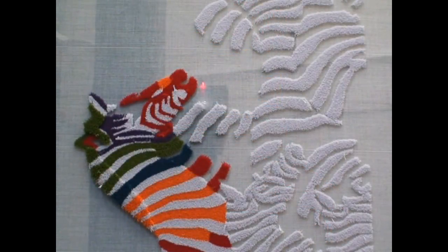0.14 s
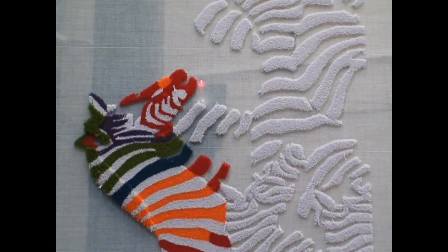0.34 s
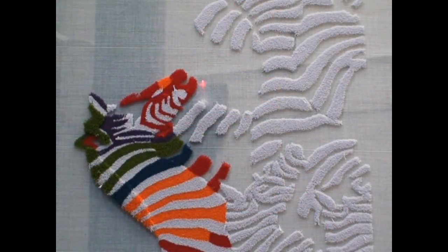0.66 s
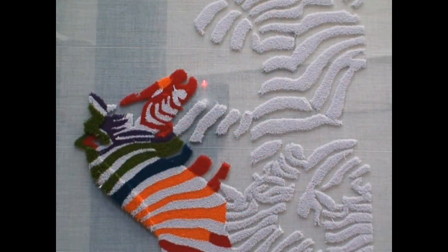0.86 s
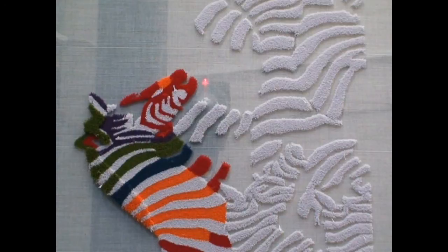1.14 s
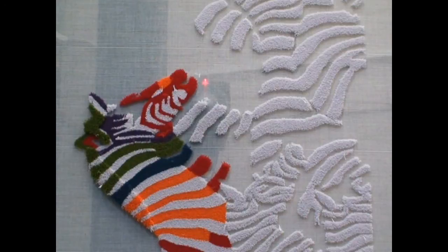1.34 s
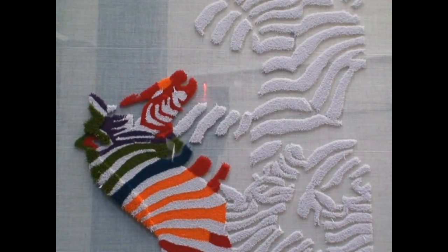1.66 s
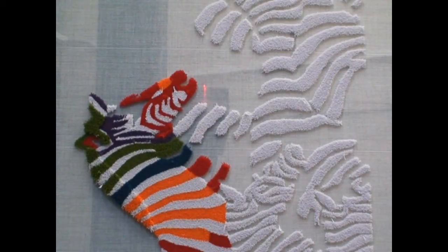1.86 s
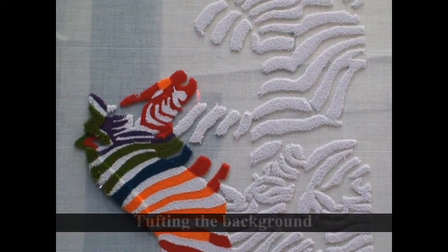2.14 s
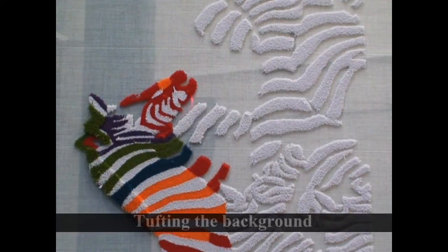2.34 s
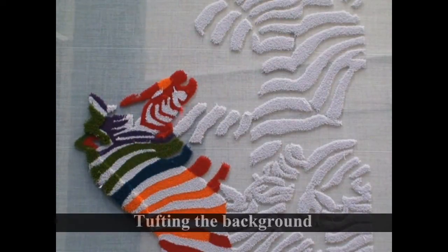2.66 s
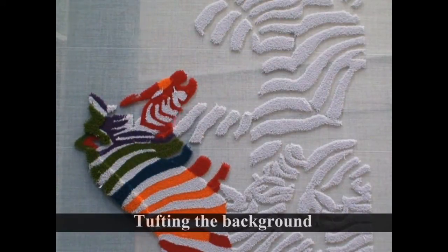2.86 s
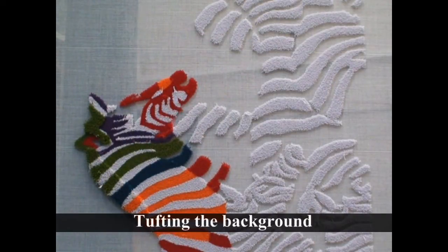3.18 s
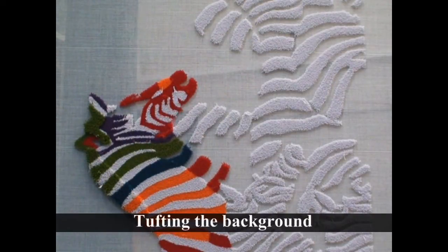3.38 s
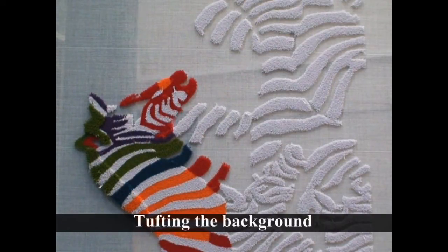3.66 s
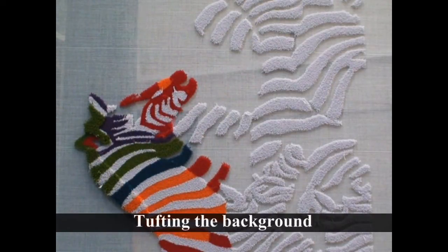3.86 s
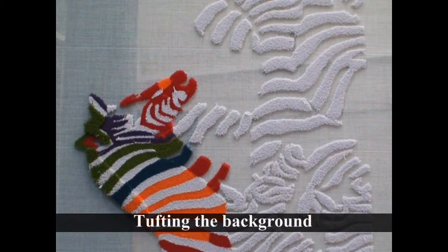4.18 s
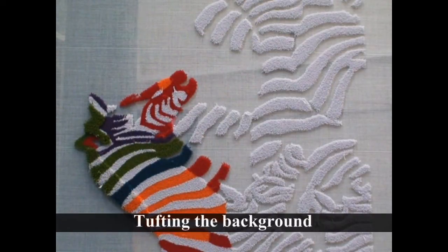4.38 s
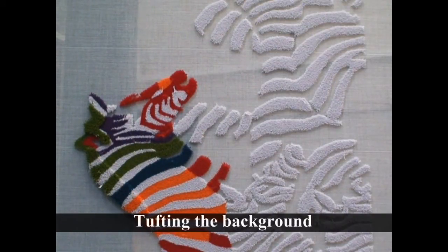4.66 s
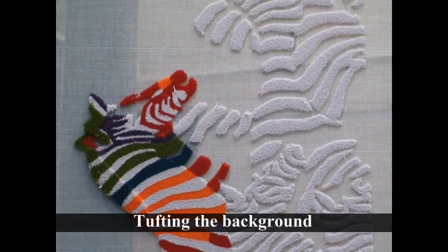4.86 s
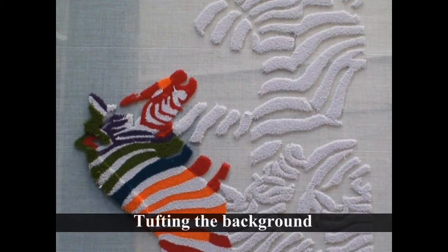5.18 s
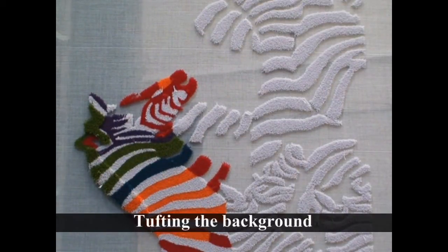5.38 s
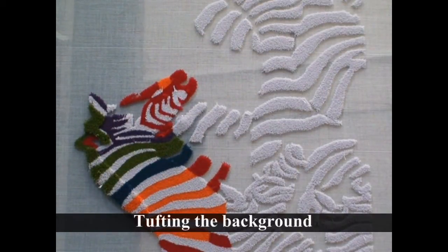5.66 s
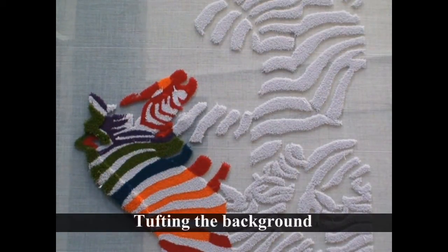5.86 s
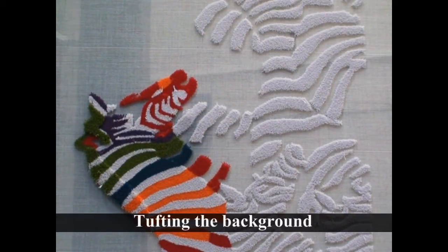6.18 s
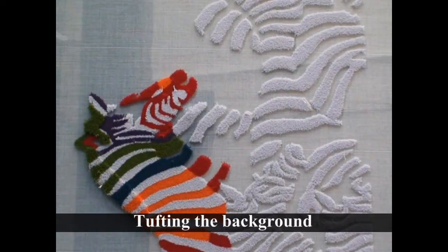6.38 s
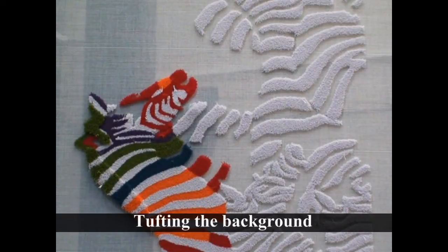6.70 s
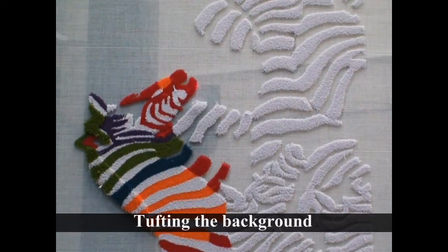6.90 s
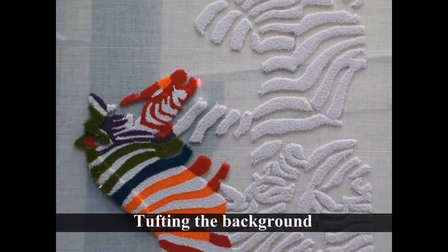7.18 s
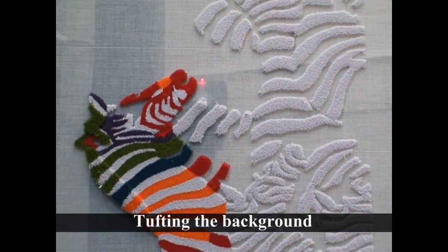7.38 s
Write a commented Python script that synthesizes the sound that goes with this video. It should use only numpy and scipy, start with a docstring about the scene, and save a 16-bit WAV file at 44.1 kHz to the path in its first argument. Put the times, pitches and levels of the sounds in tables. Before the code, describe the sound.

A pneumatic tufting machine hammers about seventeen times a second with puffs of air and an early hissing blast. It stops, stutters briefly and coasts down. A dull clunk leads into a whining, hissing head travel that brakes smoothly. A knock and air blast follow, then a low rumble, and the hammering resumes to the end with two close blasts. Close stereo in a ringing workshop.

```python
"""A tufting machine hammers yarn into a stretched cloth at about 17 stitches a second: knocks and air puffs,
with a blast of air near the start. After about a second it pauses, stitches briefly and coasts to a halt.
The head travels with a whine and a hiss, vents a blast of air and shifts with a rumble. It then stitches to
the end, with two more blasts. Knocks and air are shaped noise, the whine is a set of sines on one speed
curve, and a gain control holds down the loudest moments. A quiet workshop lies behind it all."""
import sys
import numpy as np
from scipy import signal
from scipy.fft import rfft, irfft
from scipy.io import wavfile
from scipy.ndimage import uniform_filter1d

SR = 44100
rng = np.random.default_rng(int(sys.argv[2]) if len(sys.argv) > 2 else 0)


def write(x):
    x = np.atleast_2d(x).T
    wavfile.write(sys.argv[1], SR, np.round(np.clip(x, -1, 1) * 32767).astype(np.int16))


N = 332514
T, HZ = np.arange(N) / SR, np.fft.rfftfreq(N, 1 / SR)  # time in s, frequencies in Hz

STITCH_HZ = 16.642
# bursts of stitching: first stitch t/s, end t/s, air level/dB
BURSTS = [(-.009, 1.043, -1.5), (1.13, 1.27, -4.5), (4.9, 4.905, 0.5), (5.0069, 7.55, 0)]
# knocks within one stitch: t/s after the air valve opens, low thud level/dB, clack level/dB
KNOCKS = [(0, -1.5, -3.5), (.006, 0, -3), (0.013, -2, -5), (0.019, -0.5, -10), (0.025, -7.5, 1),
          (.029, -0.5, -1), (.04, -3, 1), (.046, 4, -0.5), (.056, -1, -2.5)]
# the needle drive runs: start t/s, stop t/s, force level/dB, share of loose rattle level/dB,
# depth of the frame's resonances (0-1)
RUNS = [(-.01, 0.092, -22, -4, 0.9), (0.095, 1.24, -24.5, -3.5, 0.63), (4.879, 7.54, -22, -8, 1)]
FADE_DB_PER_S = 0.6  # the hammering weakens slightly as a run goes on
# it starts softly and dies away when switched off
SPIN_UP_S, SPIN_UP_DB, RUN_DOWN_DB_PER_S = 0.058, -4, 71
# colour of the frame: f/Hz, level/dB
FRAME = [(24, -55), (40, -26), (86, -10), (174, 1.5), (245, 3), (307, -2), (404, 1.5), (554, 0),
         (680, -3.5), (761, -1), (1120, -7.5), (2000, -11), (5990, -26.5), (8040, -26.5), (9000, 2),
         (11700, -48), (19800, -120)]
# resonances and dips of the head and its frame: f/Hz, width f/Hz, level/dB against the frame's colour
FRAME_MODES = [(167.7, 9.9, 4), (203, 24, 5), (240, 14.5, -8.5), (304.8, 26.4, 7.5), (351, 21, 5),
               (412, 20, -0.5), (445, 12, 5), (486, 12, 4), (515.4, 13, 7.5), (558, 20, 8), (620, 9.2, 3),
               (635, 15, 3.5), (677, 26, -4), (749, 16, 5), (853, 23, -8), (892, 13, 5.5), (925, 20, 7),
               (982, 16, 9.5), (1052, 18, 4.5), (1225, 30, 6), (1436, 28, 9), (1614, 21, 7), (2030, 12, 9)]
# a resonance swells as the head passes a lively spot: start t/s, length t/s, f/Hz, width f/Hz, level/dB
LIVELY_SPOTS = [(1.1, 0.62, 918, 15, 12), (4.86, 0.63, 886, 18, 9.5), (6.2, 2.1, 566.4, 13.7, 7),
                (7.218, 0.42, 494, 47, 7)]

# air while stitching, before pressure and setting: yarn jet, steady hiss and the nozzle's faint whistle
JET_DB, HISS_DB, WHISTLE_DB = -23.5, -23.5, -32
SHUT_OFF_DB_PER_S = 139
# the supply sags for as long as the valve vents, then refills
SAG_DB_PER_S, REFILL_S = 22.5, 0.58
# colour of the yarn jet: f/Hz, level/dB
JET = [(500, -2.5), (2000, 2), (4000, 1), (7000, 5.5), (10000, 6.5), (12500, 3), (14300, -5), (15000, -53)]
# colour of the steady hiss: f/Hz, level/dB
HISS = [(300, -10), (1000, 2), (2000, -1.5), (3000, 4), (3500, -0.5), (4100, 3), (5000, 0), (6000, 4),
        (7300, -10.5), (10000, -14.5), (14000, -54)]
# resonances of the whistling nozzle: f/Hz, width f/Hz, level/dB
NOZZLE = [(9830, 450, 1.5), (9400, 1700, -8), (11740, 850, -5.5)]
# the nozzle whistles louder: start t/s, length t/s, level/dB above its faint whistle
WHISTLES = [(-.15, 0.3, 11), (0.364, 0.48, 13), (0.936, 0.15, 12), (7.19, 0.34, 7)]

# the air valve vents: opening t/s, time open t/s, rush level/dB, hollow roar of the exhaust level/dB
BLASTS = [(0.085, 0.2, -10.5, -37), (3.641, 0.045, -38, -37), (3.684, 0.17, -13, -28.5),
          (5.854, 0.135, -12.5, -35), (5.985, 0.06, -7.5, -34)]
# colour of the rush: f/Hz, level/dB
BLAST = [(400, -46), (1300, -16), (2300, -7), (3100, -5.5), (3900, 1), (5000, 2), (6500, 1.5), (9500, 1.5),
         (12000, 1), (13200, -3.5), (15000, -12)]
# resonances and dips of the vent: f/Hz, width f/Hz, level/dB
VENT_MODES = [(4300, 380, -5.5), (4800, 300, -1), (5530, 410, -5), (6270, 690, 1.5), (9900, 900, -0.5),
              (11000, 500, -2)]
# colour of the roar: f/Hz, level/dB
EXHAUST = [(400, -23), (900, -1), (1300, 1.5), (1750, 8), (2300, 14), (3000, 7), (5000, -23), (9000, -14.5),
           (15000, -43)]
# resonances and dips of the exhaust: f/Hz, width f/Hz, level/dB
EXHAUST_MODES = [(1260, 86, 14), (2262, 290, 4.5), (3382, 410, -15), (3830, 130, 2), (5070, 280, 11.5)]

# the head is set down or lifted: t/s, level/dB, time to fall by 60 dB t/s
CLUNKS = [(1.838, -23.5, 0.92), (1.865, -28.5, 1), (4.881, -51, 0.13)]
# colour of these blows: f/Hz, level/dB
CLUNK = [(25, -38), (45, -22), (66, 5), (110, 11.5), (180, 0), (300, -2), (500, -7), (750, -9.5),
         (2000, -29), (5000, -34), (12000, -70)]
# the air cylinder knocks at both ends of its stroke: t/s, level/dB, time to fall by 60 dB t/s
CYLINDER_KNOCKS = [(3.648, -28.5, 0.31), (3.843, -34.5, 0.64)]
# colour of the cylinder's knocks: f/Hz, level/dB
CYLINDER = [(30, -16), (66, 2), (120, -3), (200, 7.5), (300, 2), (600, -4), (900, -7), (2000, -19),
            (8000, -55)]
# the nozzle spits as the air comes on: t/s, level/dB, time to fall by 60 dB t/s
SPITS = [(1.131, -23, 0.52), (3.639, -25, 0.67), (4.881, -27, 0.045), (4.903, -21, 0.086),
         (5.0115, -11.5, 0.18)]

# the needle drive coasts to a halt, its clatter swelling slightly and then fading
COAST_FROM_S, COAST_PEAK_S, COAST_PEAK_DB = 1.287, 1.48, -27
COAST_RISE_DB_PER_S, COAST_FALL_DB_PER_S = 1, 77
# colour of the coasting clatter: f/Hz, level/dB
COAST = [(100, -1), (220, 3), (330, 13), (400, 1), (480, 8.5), (720, -2), (920, 0.5), (1200, -20),
         (3000, -19), (9000, -57)]

# the head travels once: it speeds up, cruises and brakes smoothly to a halt
TRAVEL_S, SPEED_UP_S, BRAKE_S, BRAKING_S = 1.895, .105, 2.663, 0.43
CRUISE_HZ = 177  # basic pitch at full speed
SLIDE_DB, DRIVE_DB = -15.5, -22  # at cruising speed
# overtones of the drive: multiple of its basic pitch, level/dB
DRIVE_ORDERS = [(2, -10), (3, -16), (4, -9), (6, -9), (7, -14), (8, -8), (10, -20), (12, -9), (14, -17)]
# colour of the drive's grinding: f/Hz, level/dB
DRIVE = [(50, -36), (110, -9), (150, 7), (230, -19), (350, 0), (500, 1), (650, -5.5), (850, -4), (1200, -7),
         (2000, -11), (4000, -52)]
# resonances and dips of the rail: f/Hz, width f/Hz, level/dB
RAIL_MODES = [(345, 24, 3.5), (378, 20, 7.5), (408, 16, -5), (476, 44, 6), (562, 32, 9), (900, 98, -6),
              (1055, 49, 3.5)]
# the rail sings when an order of the drive meets a sharp resonance: f/Hz, width f/Hz, level/dB
RAIL_RINGS = [(477, 19, -37), (524.4, 15.4, -19), (643, 22, -31), (704, 26, -29)]
# colour of the sliding hiss: f/Hz, level/dB
SLIDE = [(700, -14), (1300, -37), (2200, -11), (2900, -8), (3900, -1.5), (5400, 0.5), (6500, -1.5),
         (8000, -7.5), (10000, -11), (12000, -16.5), (13600, -22), (14300, -57)]
# resonances within the sliding hiss: f/Hz, width f/Hz, level/dB
SLIDE_MODES = [(2803, 78, 10.5), (4150, 150, 0), (5280, 100, 2.5)]
# the rail howls as the head gathers speed and brakes: start t/s, length t/s, f/Hz, level/dB
HOWLS = [(1.994, .11, 526.6, -31), (1.997, 0.31, 648, -32), (2.704, 0.12, 520, -22),
         (2.72, 0.16, 489, -23.5), (2.86, 0.35, 538, -38), (2.935, 0.12, 760, -42)]

# slow shifts of the gantry: start t/s, length t/s, grinding level/dB, delay of the boom t/s, boom level/dB
SHIFTS = [(1.115, 0.63, -38.5, 0.2, -38.5), (1.8, 1.8, -43.5, 0.095, -47.5), (4.096, 0.24, -48, 0.031, -43),
          (4.185, 0.62, -35, 0.13, -39)]
# colour of the gantry: f/Hz, level/dB
GANTRY = [(25, -32), (65, -2.5), (150, 1), (235, -2), (400, -12), (520, -24), (620, -22), (830, -13),
          (950, -25), (1300, -22.5), (1700, -24.5), (2500, -24.5), (4000, -32.5), (9000, -47),
          (14000, -73.5)]
# resonances that the gantry's whirr excites: f/Hz, width f/Hz, level/dB
GANTRY_MODES = [(159, 16, 6), (250, 21, 4.5), (308, 14, 8), (378, 18, 5.5), (803, 30, 4), (1046, 27, 10),
                (1310, 60, 9)]

# air seeps from the idle nozzle, easing to a steady leak until the head moves off
SEEP_FROM_S, SEEP_UNTIL_S, SEEP_DB = 1.37, 1.92, -47.5
SEEP_EXTRA_DB, SEEP_EASE_S = 5, .18
# colour of the seeping air: f/Hz, level/dB
SEEP = [(1000, -10), (2400, -4), (2950, 10), (3500, 3), (5500, 3.5), (8500, -2), (10000, -2), (11200, 5),
        (12300, -4), (13200, -34)]
SHOP_DB = -43.5
# colour of the workshop's background noise: f/Hz, level/dB
SHOP = [(25, -22), (60, -11), (120, -3), (230, -16), (310, -10), (480, -12.5), (900, -17), (1600, -22),
        (3000, -29.5), (7300, -41), (12000, -44), (14000, -64)]
# a faint, thin sizzle: f/Hz, width f/Hz, level/dB
SHOP_SIZZLE = [(12100, 450, 15.5)]
# faint, wavering hum tones: f/Hz, level/dB
HUM = [(116, -64), (307, -53.5), (520, -59.5), (1340, -68), (9324, -78)]

# how long the room rings: f/Hz, time to fall by 60 dB t/s
ROOM = [(200, 1), (1500, 1), (4000, 0.91), (8000, 0.62), (14000, 0.29)]
# resonances and dips of the stretched cloth, under every source: f/Hz, width f/Hz, level/dB
CLOTH_MODES = [(67, 20.3, 5.5), (86, 16, -15), (109, 7.5, 4)]
# stereo width: f/Hz, side level/dB
WIDTH = [(40, -29), (130, -22), (300, -8.5), (700, -9.5), (1500, -8), (5500, -7.5), (8000, -11),
         (11000, -25), (14000, -54)]
# stereo balance: f/Hz, left minus right level/dB
LEAN = [(60, 2), (300, 1), (700, 0.5), (1500, 1.5), (12000, -0.2)]
# the two microphone ports: f/Hz, phase by which left leads/radians
LEAD = [(0, -0.49), (340, -0.73), (690, -0.44), (950, -0.89), (1380, 0.57), (3010, -0.07), (5680, 0.63),
        (7840, 0.45), (11000, 0.12), (15200, 0)]
EDGE_HZ = 15160  # the treble ends here


def amp(db):
    """Turns dB into a plain gain."""
    return 10 ** (np.asarray(db) / 20)


def unit(x):
    """Scales each channel to rms 1."""
    return x / np.sqrt(np.mean(x ** 2, -1, keepdims=True) + 1e-20)


def read(points, hz=HZ):
    """Reads a curve joined by straight lines over log frequency."""
    f, value = np.transpose(points)
    return np.interp(np.log(hz + 1), np.log(f + 1), value)


def bumps(modes):
    """Resonances and dips as a dB curve."""
    return sum(db / (1 + ((HZ - hz) / (width / 2)) ** 4) for hz, width, db in modes)


def below_db(hz):
    """A dB curve that keeps what lies below hz."""
    return -10 * np.log10(1 + (HZ / hz) ** 4)


def above_db(hz):
    """A dB curve that keeps what lies above hz."""
    return -10 * np.log10(1 + (hz / (HZ + 1)) ** 4)


def colour(x, db):
    """Filters x by a gain in dB for every frequency."""
    return irfft(rfft(x) * amp(db), N)


def noise(db):
    """Mid and side noise of the given colour, each of rms 1."""
    return unit(colour(rng.standard_normal((2, N)), db))


def wander(hz):
    """A random curve of rms 1 that changes no faster than about hz."""
    return unit(irfft(rfft(rng.standard_normal(N)) / (1 + (HZ / hz) ** 4), N))


def gate(start, end, edge):
    """Rises after start and falls after end, within edge seconds."""
    return np.clip((T - start) / edge, 0, 1) * np.clip((end - T) / edge + 1, 0, 1)


def held(start, end, release_db_per_s):
    """Switches on at start, holds, and dies away after end."""
    return np.clip((T - start) / 0.0026, 0, 1) * amp(-release_db_per_s * np.maximum(T - end, 0))


def settling(start, ease_s):
    """Stays at 1 until start, then eases towards 0."""
    return np.exp(-np.maximum(T - start, 0) / ease_s)


def arch(start, length):
    """A smooth swell from 0 to 1 and back."""
    return np.sin(np.pi * np.clip((T - start) / length, 0, 1))


def tone(hz, rough):
    """A sine on a pitch curve, shaken slightly."""
    return np.cos(2 * np.pi * np.cumsum(hz * (1 + rough * wander(53.0))) / SR)


def ring(x, hz, width_hz):
    """One narrow resonance of gain 1 that rings on after its drive."""
    r = np.exp(-np.pi * width_hz / SR)
    return 2 * signal.lfilter([1 - r], [1, -r * np.exp(2j * np.pi * hz / SR)], x + 1e-18).real


def each_stitch(shape):
    """Repeats one stitch's shape at every stroke of the needle."""
    starts = np.concatenate([np.arange(first, end, 1 / STITCH_HZ) for first, end, air_db in BURSTS])
    strokes = np.zeros(N + 2 * SR)  # a spare second at both ends
    strokes[np.round((starts + 1) * SR).astype(int)] = 1
    return signal.oaconvolve(strokes[None], np.atleast_2d(shape), axes=1)[:, SR:SR + N]


def stitch_time():
    """The time within one stitch, in seconds."""
    return np.arange(round(SR / STITCH_HZ)) / SR


def dying_knock(start, ring_s):
    """A knock that fades within one stitch, its tail wrapping round to the beginning."""
    return np.exp(-((stitch_time() - start) % (1 / STITCH_HZ)) / ring_s)


def one_stitch(thud, clack, split_hz, evenness=1.0, count=2):
    """The knocks of one stitch: thuds in the bass, clacks above, compact in time, feeding all f/Hz alike."""
    bass = 1 / (1 + (np.fft.rfftfreq(len(thud), 1 / SR) / split_hz) ** 4)
    stitch = rng.standard_normal((2, len(thud)))
    for _ in range(count):
        z = bass * rfft(unit(thud) * stitch) + (1 - bass) * rfft(unit(clack) * stitch)
        stitch = irfft(z / abs(z) ** evenness, len(thud))  # level out the spectrum
    return unit(stitch)


def drifting(x, depth_db):
    """As the head moves over the frame, each band of the sound swells and fades in its own time."""
    z = signal.stft(x, SR, nperseg=2048)[2]
    patches = uniform_filter1d(rng.standard_normal(z.shape[1:]), size=16, axis=1)
    patches = uniform_filter1d(patches, size=2, axis=0)
    return signal.istft(z * amp(depth_db * patches / patches.std()), SR, nperseg=2048)[1][:, :N]


def hammering(ring_s=0.006, split_hz=650, loose_hz=2700, top_hz=3200, drift_s=.00008, drift_db=1.22):
    """The needle drive repeats its knocks closely in the bass; loose parts rattle anew in every stitch."""
    blows = [(dying_knock(s, ring_s), low, high) for s, low, high in KNOCKS]
    thud = sum(amp(low) * blow for blow, low, high in blows)
    clack = sum(amp(high) * blow for blow, low, high in blows)
    stitch = one_stitch(thud, clack, split_hz)
    modes = bumps(FRAME_MODES)
    body = read(FRAME) + modes + below_db(top_hz)
    body -= 10 * np.log10(np.mean(amp(body) ** 2))
    tight = 1 / (1 + (HZ / loose_hz) ** 4)  # share of the power that repeats
    clock = T + drift_s * wander(1.75)  # the stitching speed wavers slightly at random
    steady = np.array([np.interp(clock, T, channel) for channel in each_stitch(stitch)])
    shaken = (1.64 + 0.35 * each_stitch(unit(clack))) * rng.standard_normal((2, N))
    out = np.zeros((2, N))
    for start, stop, force_db, loose_db, depth in RUNS:
        repeating = (1 - min(amp(loose_db) ** 2, 1)) * tight
        frame = body - (1 - depth) * modes
        knocks = colour(steady, frame + 10 * np.log10(repeating + 1e-9))
        rattle = colour(shaken, frame + 10 * np.log10(1 - repeating + 1e-9))
        spin_up_db = SPIN_UP_DB * settling(start, SPIN_UP_S)
        fade_db = FADE_DB_PER_S * (T - start)
        force = amp(force_db + spin_up_db - fade_db) * held(start, stop, RUN_DOWN_DB_PER_S)
        out = np.where(T < start, out, force * (knocks + rattle))  # a new run replaces the old one
    out = drifting(out, drift_db)
    lively = sum((amp(db) - 1) * arch(s, length) * ring(out, hz, width)
                 for s, length, hz, width, db in LIVELY_SPOTS)
    return out + lively


def ticks(tick_db=-33, ring_s=0.0009, uneven_db=4, low_hz=1200, top_hz=7000):
    """Metal meets metal at every knock: a sharp tick of noise whose strength varies by chance."""
    blows = sum(amp(high) * dying_knock(s, ring_s) for s, low, high in KNOCKS)
    running = sum(gate(start, stop, .01) for start, stop, *levels in RUNS)
    strength = running * amp(tick_db + uneven_db * np.minimum(wander(140), 2))
    return strength * each_stitch(unit(blows)) * noise(above_db(low_hz) + below_db(top_hz))


def workshop(x, wet_db):
    """The room holds each band's energy and lets it die away as a diffuse wash, treble first."""
    hz, t, z = signal.stft(x, SR, nperseg=256)
    decay = amp(-120 * t[:, None] / read(ROOM, hz)).T  # 60 dB of power in the ringing time
    decay /= decay.sum(1, keepdims=True)
    power = signal.fftconvolve(abs(z) ** 2, decay[None], axes=2)[:, :, :len(t)]
    chance = signal.stft(rng.standard_normal((2, N)), SR, nperseg=256)[2]
    wash = signal.istft(np.sqrt(abs(power)) * chance, SR, nperseg=256)[1]
    late = np.pad(wash, ((0, 0), (256, 0)))[:, :N]  # 256 samples after the direct sound
    wet = x.std() * unit(late)
    return (x + amp(wet_db) * wet) / np.hypot(1, amp(wet_db))


def supply_db():
    """Air pressure drops with every blast and creeps back."""
    return -SAG_DB_PER_S * sum(np.clip(T - s, 0, length) * settling(s + length, REFILL_S)
                               for s, length, *levels in BLASTS)


def yarn_air(open_s=0.017, close_s=0.042, chirp_s=0.044, uneven_db=1.5, spit_db=0.5, jet_share=0.36,
             hiss_share=0.092, build_s=0.01, build_db=-5):
    """A puff blows yarn through the needle each stitch; the opening nozzle whistles, louder with more air."""
    swell_db = sum(db * arch(s, length) for s, length, db in WHISTLES)
    flows = [held(first, end, SHUT_OFF_DB_PER_S) * amp(build_db * settling(first, build_s))
             for first, end, air_db in BURSTS]
    flowing = np.max(flows, axis=0)
    t = stitch_time()
    rise = 1 - np.exp(-t / 0.0004)
    puff = each_stitch(unit(rise * np.exp(-np.maximum(t - open_s, 0) / close_s)))
    chirp = each_stitch(unit(rise * np.exp(-t / chirp_s)))
    nozzle_power = sum(amp(db) ** 2 / (1 + ((HZ - hz) / (width / 2)) ** 2) ** 2 for hz, width, db in NOZZLE)
    nozzle = 10 * np.log10(nozzle_power)
    jet = puff * amp(JET_DB + jet_share * swell_db + uneven_db * wander(25.0)) * noise(read(JET))
    whistle = chirp * amp(WHISTLE_DB + swell_db + 2.14 * wander(6.4)) * noise(nozzle)
    hiss = flowing * amp(HISS_DB + hiss_share * swell_db) * noise(read(HISS))
    setting_db = np.zeros(N)
    for first, end, air_db in BURSTS:
        setting_db[T >= first] = air_db
    level = amp(setting_db + supply_db() + spit_db * wander(630))
    return workshop((jet + whistle + hiss) * level, wet_db=-3.5)


def blasts(sputter_db=0.5, wet_db=1, valve_s=0.0087):
    """Compressed air rushes out, sounds the exhaust and fills the room."""
    rush = sum(amp(db) * gate(s, s + length, valve_s) for s, length, db, roar_db in BLASTS)
    roar = sum(amp(roar_db) * gate(s, s + length, valve_s) for s, length, db, roar_db in BLASTS)
    air = rush * noise(read(BLAST) + bumps(VENT_MODES))
    air += roar * noise(read(EXHAUST) + bumps(EXHAUST_MODES))
    return workshop(air * amp(sputter_db * wander(430)), wet_db)


def strikes(rows, spectrum):
    """Sudden bursts of noise of one colour, each dying away at its own speed."""
    level = sum(amp(db - 60 * np.maximum(T - s, 0) / ring_s) * gate(s, s + 1, 0.0015)
                for s, db, ring_s in rows)
    return level * noise(read(spectrum))


def clunks():
    """Dull blows that shake the whole frame, knocks of the air cylinder and sharp spits of the nozzle."""
    return strikes(CLUNKS, CLUNK) + strikes(CYLINDER_KNOCKS, CYLINDER) + strikes(SPITS, JET)


def coasting(throb_hz=30, throb_db=1.5):
    """With the air shut off, the needle drive clatters on for a moment as throbbing noise."""
    throb = np.sin(2 * np.pi * np.cumsum(throb_hz * (1 + 0.195 * wander(7.8))) / SR)
    after_peak_s = T - COAST_PEAK_S
    fade_db = np.maximum(-COAST_RISE_DB_PER_S * after_peak_s, COAST_FALL_DB_PER_S * after_peak_s)
    freed = np.clip((T - COAST_FROM_S) / 0.13, 0, 1)
    return freed * amp(COAST_PEAK_DB - fade_db + throb_db * throb) * noise(read(COAST))


def travel(whine_db=-6, whine_rough=0.012, song_rough=0.0038, wet_db=-1, slide_power=1.47,
           drive_power=0.89, braking_db=2.0, load_s=0.041, drive_wet_db=-7, low_hz=110):
    """The drive's orders and grinding ring the rail under a broad hiss, all growing with its thrust."""
    under_way = 1 - settling(TRAVEL_S, SPEED_UP_S)
    braked = np.clip((T - BRAKE_S) / BRAKING_S, 0, 1)
    thrust = under_way * (1 - braked)
    speed = under_way * (1 - braked ** 2)  # the head's mass carries it on as the thrust eases
    effort = thrust ** drive_power * amp(braking_db * np.clip((T - BRAKE_S) / load_s, 0, 1))
    whine = unit(sum(amp(db) * tone(order * CRUISE_HZ * speed, whine_rough) for order, db in DRIVE_ORDERS))
    middle_whine = amp(whine_db) * speed * whine * np.array([[1], [0]])
    grinding = noise(read(DRIVE))
    drive = amp(DRIVE_DB) * effort * unit(colour(grinding + middle_whine, bumps(RAIL_MODES)))
    shaking = effort * sum(tone(order * CRUISE_HZ * speed, song_rough) for order in (3, 4))
    song = sum(amp(db) * ring(speed * shaking, hz, width) for hz, width, db in RAIL_RINGS)
    drive[0] += np.sqrt(2) * song
    drive = colour(workshop(drive, drive_wet_db), above_db(low_hz))  # the drive and its room wash carry no deep bass
    slide_level = thrust ** slide_power * amp(SLIDE_DB + 0.44 * wander(150))
    slide = slide_level * noise(read(SLIDE) + bumps(SLIDE_MODES))
    return drive + workshop(slide, wet_db)


def howls(rough=0.0083):
    """Wavering tones that swell out of the rail and fade."""
    song = sum(amp(db) * arch(s, length) * unit(tone(hz, rough)) for s, length, hz, db in HOWLS)
    return np.array([[1], [0]]) * song


def gantry(judder_hz=38, judder_db=2, pivot_hz=200, boom_power=1.0, grind_power=1.6):
    """Slow moves judder through the frame: a whirr swells and fades, and a deep boom builds a little later."""
    grind = sum(amp(db) * arch(s, length) ** grind_power for s, length, db, lag, boom_db in SHIFTS)
    boom = sum(amp(boom_db) * arch(s + lag, length) ** boom_power for s, length, db, lag, boom_db in SHIFTS)
    low = noise(read(GANTRY) + below_db(pivot_hz))
    high = noise(read(GANTRY) + bumps(GANTRY_MODES) + above_db(pivot_hz))
    judder = np.sin(2 * np.pi * np.cumsum(judder_hz * (1 + 0.099 * wander(9.7))) / SR)
    return amp(judder_db * judder) * (boom * low + grind * high)


def background():
    """Fans as noise, idle electrics as wavering sines, and air seeping from the nozzle."""
    hum = sum(amp(db) * unit(np.sin(2 * np.pi * hz * T + 1.95 * wander(11.3))) for hz, db in HUM)
    easing_db = SEEP_EXTRA_DB * settling(SEEP_FROM_S, SEEP_EASE_S)
    leak = amp(SEEP_DB + easing_db) * gate(SEEP_FROM_S, SEEP_UNTIL_S, 0.086) * noise(read(SEEP))
    fans = amp(SHOP_DB) * noise(read(SHOP) + bumps(SHOP_SIZZLE))
    return fans + hum * np.array([[1], [0]]) + leak


def reflections(echo_db=-13, spread_s=.012, count=24):
    """Short echoes off the frame ripple the treble: a gain in dB for every frequency."""
    echoes = np.zeros(N)
    at = ((.001 + spread_s * rng.random(count)) * SR).astype(int)
    echoes[at] = amp(echo_db) * rng.choice([-1, 1], count) / np.sqrt(count)
    ripple_db = 20 * np.log10(abs(1 + rfft(echoes)) + 1e-3)
    return ripple_db * (1 - 1 / (1 + (HZ / 1800) ** 4))  # long waves bend round the frame


def scene():
    """All sources as mid and side, reaching a pair of microphone ports a little from the left."""
    sources = hammering() + ticks() + yarn_air() + blasts() + clunks()
    sources = sources + coasting() + travel() + howls() + gantry() + background()
    mid, side = colour(sources, bumps(CLOTH_MODES) + reflections())
    side = colour(side, read(WIDTH))
    port = amp(read(LEAN) / 2) * np.exp(1j * read(LEAD) / 2)  # half the difference for each port
    left = irfft(rfft(mid + side) * port, N)
    right = irfft(rfft(mid - side) / port, N)
    return np.array([left, right])


def record(dry, threshold_db=-15.5, squeeze=0.89, recovery_db_per_s=55):
    """Gain control holds the loudest moments down and recovers steadily; then the top treble is cut."""
    power_db = 10 * np.log10(abs(uniform_filter1d((dry ** 2).mean(0), size=700)) + 1e-12)
    fall = T * recovery_db_per_s
    peak_db = np.maximum.accumulate(power_db + fall) - fall  # jumps up, sinks slowly
    over_db = np.maximum(peak_db - threshold_db, 0)
    ducked = dry * amp(-squeeze * uniform_filter1d(over_db, size=300))
    low_pass = signal.firwin(601, EDGE_HZ, window=("kaiser", 9), fs=SR)
    return signal.oaconvolve(ducked, low_pass[None], "same")


dry = scene()
out = record(dry)
write(out)
```